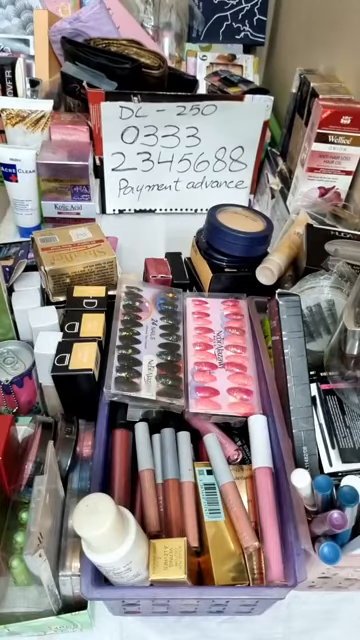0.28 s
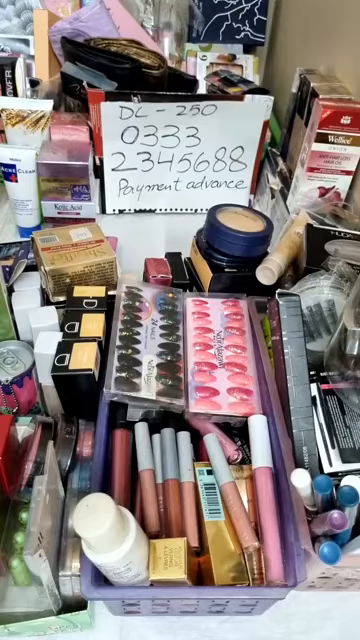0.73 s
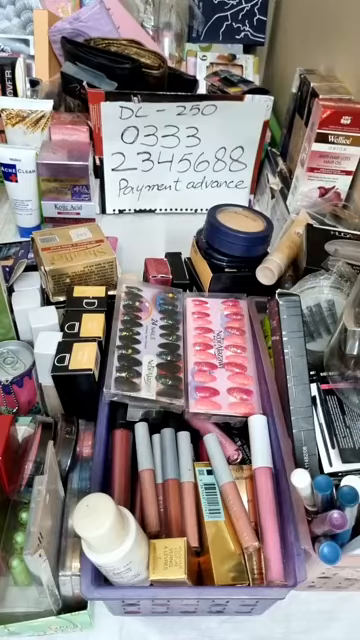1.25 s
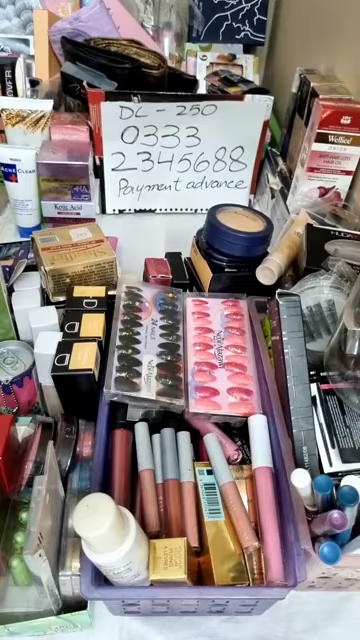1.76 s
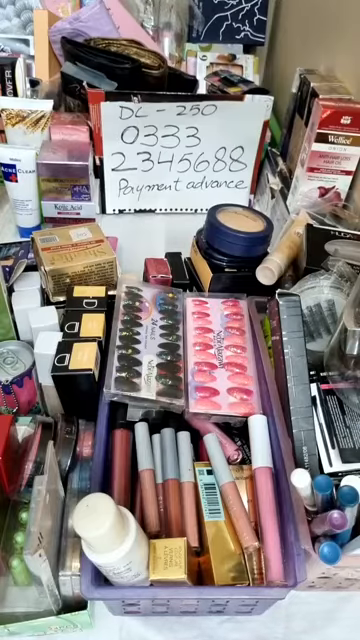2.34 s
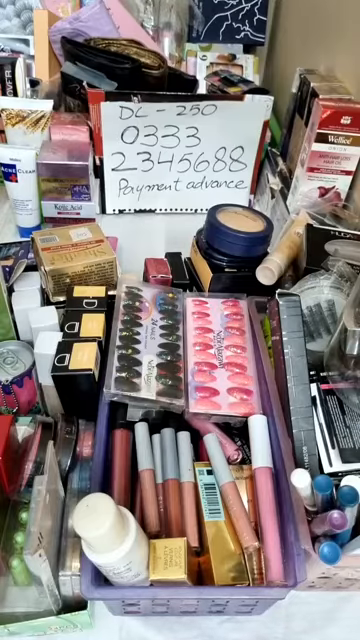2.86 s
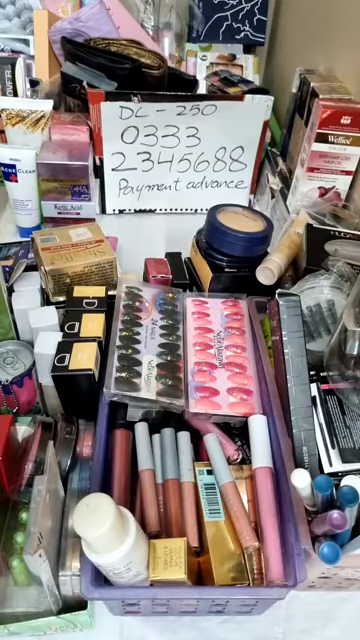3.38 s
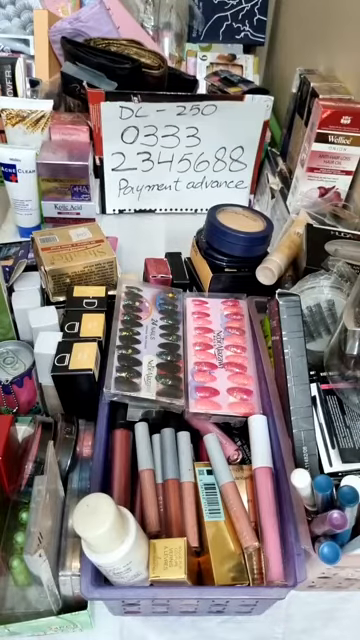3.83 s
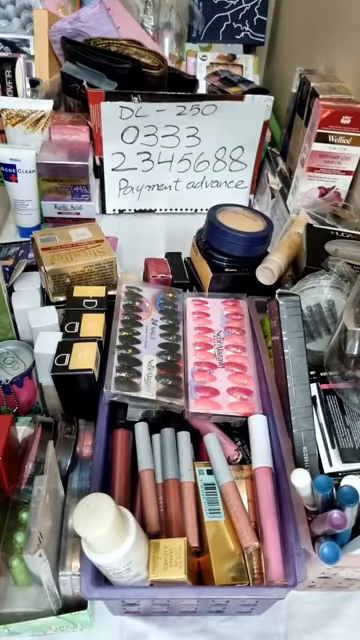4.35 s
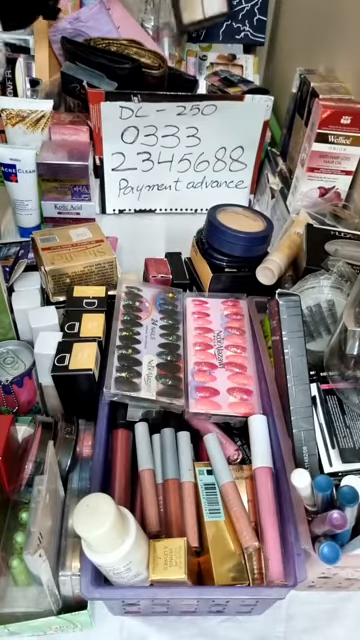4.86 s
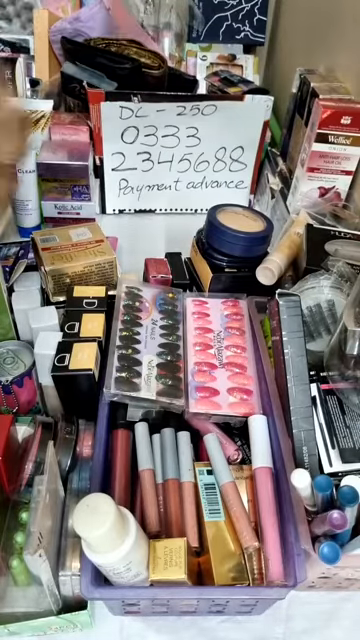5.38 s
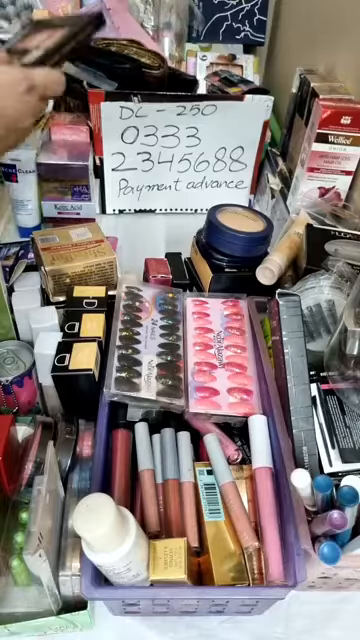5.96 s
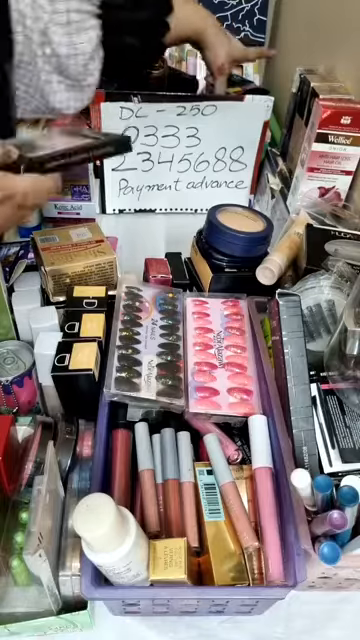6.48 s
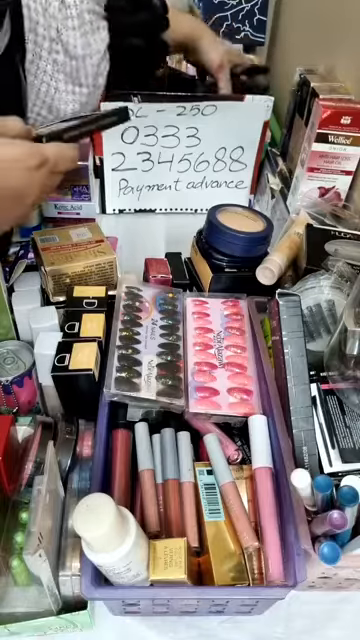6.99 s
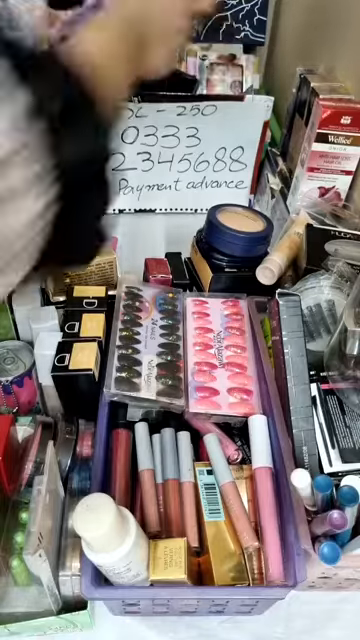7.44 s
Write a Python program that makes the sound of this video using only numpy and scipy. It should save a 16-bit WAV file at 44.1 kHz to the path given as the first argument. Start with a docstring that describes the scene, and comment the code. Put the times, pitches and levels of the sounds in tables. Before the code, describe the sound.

A small engine outside drones up and eases off over street rumble and fan hiss, brief plastic crackles nearby, then a slower engine idles in thuds.

```python
"""Engines outside a shop, fan and wrapper within

A small engine outside revs up and eases off, heard through the shop walls: harmonics of its firing rate,
with exhaust pulses ringing room resonances. Near the end a slower engine idles, each thud a ringing push.
Shaped noise makes the low street rumble and the fan hiss in the room, which throbs with the blades.
Now and then a plastic wrapper crackles near the two microphones: short bursts of grainy bright noise."""
import sys
import numpy as np
from scipy import signal
from scipy.fft import rfft, irfft
from scipy.io import wavfile
from scipy.ndimage import uniform_filter1d

SR = 44100
rng = np.random.default_rng(int(sys.argv[2]) if len(sys.argv) > 2 else 0)


def unload_audio(sound):
    """Save the sound as a 16-bit wav file, at the path given as the first command line argument."""
    columns = np.transpose(np.atleast_2d(sound))
    # keep every value between -1 and 1, then stretch to whole-number steps
    steps = np.round(np.clip(columns, -1, 1) * 32767)
    wavfile.write(sys.argv[1], SR, steps.astype(np.int16))


N = 340452

# Levels are those of each source, ahead of the left-right gains and the microphones.
# Firing speed of the revving engine. Each row: time in seconds, firings per second.
ENGINE_SPEED = [(0.0, 20.05), (0.22, 19.74), (0.34, 19.7), (0.7, 20.0), (0.94, 20.89), (1.28, 21.84),
                (1.94, 22.72), (2.24, 23.72), (2.44, 23.66), (2.8, 24.15), (2.98, 23.87), (3.14, 24.08),
                (3.22, 24.01), (3.46, 23.14), (3.54, 22.95), (3.78, 23.37), (3.88, 23.36), (4.36, 22.43),
                (4.5, 22.05), (4.7, 22.06), (4.82, 21.93), (5.3, 21.02), (5.66, 21.28), (5.98, 22.15)]
# Its strong harmonics, swelling in turn as it moves along the street.
# Each row: time in seconds, then levels of the 4th, 5th, 6th and 7th harmonic in dB.
ENGINE_HUM = [(0.04, -46.5, -44.0, -43.5, -44.0), (0.15, -52.5, -47.0, -36.5, -35.5),
              (0.32, -43.5, -39.5, -37.5, -34.0), (0.48, -45.0, -54.0, -40.0, -31.5),
              (0.64, -44.5, -45.5, -31.0, -33.5), (0.76, -40.5, -48.0, -33.5, -39.5),
              (0.86, -40.5, -29.5, -41.0, -54.0), (0.96, -38.5, -24.5, -40.5, -47.5),
              (1.06, -53.0, -21.0, -36.5, -52.5), (1.18, -52.0, -21.0, -42.5, -53.5),
              (1.3, -42.5, -27.0, -31.0, -44.5), (1.39, -49.0, -30.5, -28.5, -47.5),
              (1.5, -50.0, -28.0, -31.0, -47.5), (1.58, -52.5, -28.0, -31.5, -54.0),
              (1.66, -40.5, -45.5, -31.5, -47.5), (1.76, -41.5, -40.0, -31.0, -52.0),
              (1.9, -42.0, -33.5, -38.0, -53.5), (2.02, -37.5, -38.5, -38.5, -45.0),
              (2.12, -32.0, -31.0, -35.0, -36.0), (2.26, -35.5, -29.0, -41.5, -47.0),
              (2.42, -40.0, -35.0, -29.5, -44.0), (2.5, -40.0, -26.5, -39.0, -43.5),
              (2.59, -31.5, -22.5, -39.0, -54.0), (2.7, -42.5, -30.0, -37.5, -51.5),
              (2.8, -49.5, -30.5, -47.5, -48.5), (2.94, -42.0, -31.0, -35.5, -47.5),
              (3.02, -37.0, -26.0, -48.0, -46.0), (3.12, -41.0, -33.0, -32.0, -37.0),
              (3.2, -36.0, -25.5, -41.5, -42.5), (3.28, -42.5, -33.0, -38.0, -42.0),
              (3.36, -35.5, -32.5, -26.0, -36.0), (3.44, -38.0, -35.0, -26.5, -37.0),
              (3.54, -39.5, -29.5, -21.5, -53.0), (3.69, -48.5, -34.0, -33.0, -48.0),
              (3.8, -42.5, -30.0, -29.5, -50.0), (3.92, -40.5, -25.5, -26.0, -51.0),
              (4.1, -45.0, -29.5, -20.5, -52.0), (4.2, -51.0, -32.0, -21.0, -42.0),
              (4.3, -41.5, -26.0, -22.0, -45.5), (4.4, -38.5, -25.5, -25.0, -48.0),
              (4.54, -34.0, -21.0, -33.0, -51.0), (4.62, -35.5, -25.0, -26.5, -53.0),
              (4.72, -41.0, -27.0, -46.0, -45.0), (4.84, -41.0, -30.0, -32.0, -42.0),
              (5.02, -42.0, -30.0, -36.0, -38.5), (5.14, -51.5, -27.0, -41.5, -39.5),
              (5.28, -46.5, -29.5, -37.0, -43.5), (5.36, -41.5, -24.0, -30.5, -36.0),
              (5.43, -37.0, -23.0, -29.5, -40.5), (5.51, -36.5, -24.0, -35.0, -48.0),
              (5.58, -48.5, -39.0, -35.5, -53.0), (5.66, -47.5, -32.5, -34.0, -37.5),
              (5.74, -42.0, -49.0, -32.5, -54.0), (5.82, -46.5, -47.0, -39.5, -45.5),
              (5.98, -47.0, -45.0, -39.5, -52.5)]
# Upper buzz of the exhaust. Each row: time in seconds, buzz level in dB,
# level in dB of the drone in the highest room resonance.
EXHAUST_LEVELS = [(0, -50.5, -51.5), (1, -50, -56), (1.5, -48.5, -54), (2.0, -54, -56.5),
                  (2.45, -48, -53.5), (2.9, -41, -44), (3.3, -46, -53), (3.6, -50.5, -44),
                  (3.85, -46.5, -56), (4.1, -42, -38.5), (4.35, -42.5, -51.5), (4.6, -45, -44.5),
                  (4.95, -40, -48.5), (5.2, -46, -42), (5.35, -44, -37), (5.5, -49, -57), (5.7, -54, -62)]
# Room resonances under the buzz; sound passes them twice.
# Each row: centre in Hz, width in Hz and gain in dB for one pass.
BUZZ_RESONANCES = [(166, 17, -8), (199, 10, -2.5), (232.6, 13, -5.5), (258.1, 20, -0.5)]
# The highest room resonance, also passed twice. Its row: centre in Hz, width in Hz and gain in dB for one pass.
DRONE_RESONANCE = [(328.5, 23, 0)]
# Traffic rumble. Each row: time in seconds, level in dB, extra weight on the lowest boom in dB.
RUMBLE_LEVELS = [(0, -33.5, -6.5), (.92, -31, -11.5), (1.12, -34, -2), (1.5, -33, -11.5), (2.3, -32.5, -11),
                 (3.4, -31, -10.5), (3.9, -34, -10), (4.5, -34.5, -11.5), (5.4, -31.5, -10),
                 (5.6, -32.5, -6), (6.2, -32, -5.5), (6.5, -33, -3.5), (7.2, -31.5, -4.5),
                 (7.72, -32, -3.5)]
# Spectrum of the rumble before the boom is weighted. Each row: frequency in Hz, relative level in dB.
RUMBLE_SPECTRUM = [(20, -62), (35, -27), (48, 12), (70, 0), (100, -7), (112, 0), (123, 1), (131, -6),
                   (152, -11.5), (165, -4), (180, -11.5), (197, -7.5), (262, -15), (290, -19.5), (335, -15),
                   (365, -21.5), (900, -90)]
# Fan in the room. Each row: time in seconds, level in dB, treble lift in dB.
FAN_LEVELS = [(0, -41.5, 0), (.9, -41, 2), (1.42, -42.5, 1.5), (3.2, -41, 0.9), (3.83, -42.5, 1),
              (5.74, -42.5, 0.9), (6.3, -42.5, 0.5), (7.1, -41.5, 2.3), (7.3, -41.5, 1.5), (7.72, -41, 3.5)]
# Spectrum of the fan before lift and throb. Each row: frequency in Hz, relative level in dB.
FAN_SPECTRUM = [(180, -45), (300, -13.5), (400, -11.5), (620, -10.5), (890, -13.5), (1070, -10),
                (1250, -16), (1500, -15.5), (2100, -19.5), (3000, -24.5), (3800, -28.5), (6300, -38.5),
                (8100, -38), (8800, -45), (10300, -53), (14500, -50.5), (15600, -52)]
# Likeness of the two microphones for rumble and fan. Each row: frequency in Hz, left-right correlation (-1 to 1).
LIKENESS = [(60, 0.87), (130, 1), (290, 0.8), (640, 0.5), (1410, 0.014), (3100, 0.21), (6820, -0.28),
            (15000, 0.19)]
# Balance of rumble and fan. Each row: frequency in Hz, left minus right in dB.
BALANCE = [(60, 0.5), (200, -0.5), (380, 1), (700, 1.5), (1290, 0), (2380, 0.3), (4400, 0), (8120, -1),
           (15000, -2)]
# Wrapper bursts. Each row: start in seconds, level in dB, left minus right in dB,
# rise in seconds, time to fall by 60 dB in seconds.
WRAPPER_BURSTS = [(.694, -60.5, -.6, .004, .12), (1.041, -45.5, -1, 0.01, .16),
                  (1.644, -44, -1.1, 0.015, 0.25), (1.666, -47, -5, .003, .03),
                  (1.813, -44.5, -3, .008, 0.056), (2.37, -57, -5, 0.027, .38), (2.51, -59, -5, .015, 0.24),
                  (3.54, -60, -2, .045, 0.6), (5.57, -57, -1, .019, .3), (7.2, -53.5, -1.1, .024, .34),
                  (7.28, -58, -2, 0.02, .29), (7.5, -67, -3, .033, .4)]
# Spectrum of the wrapper. Each row: frequency in Hz, relative level in dB.
WRAPPER_SPECTRUM = [(1470, -33), (2500, 3.5), (4940, -3.5), (5930, 1), (6710, -3), (7600, 0.5), (9000, -10),
                    (11000, -16), (13900, -12), (15600, -13)]
# Idling engine, about ten thuds a second. Each row: start of the push in seconds, peak level of its thud in dB.
IDLE_THUDS = [(5.625, -24.5), (5.862, -28.5), (6.024, -30), (6.127, -30), (6.268, -25.5), (6.36, -21),
              (6.458, -19.5), (6.547, -21), (6.643, -17.5), (6.737, -19), (6.831, -18.5), (6.931, -18),
              (7.027, -23), (7.129, -21.5), (7.22, -20), (7.318, -20.5), (7.41, -25), (7.509, -19),
              (7.599, -20), (7.682, -16)]
# What each thud rings; neighbours of like sign leave a dark valley between them.
# Each row: centre in Hz, width in Hz, relative level in dB, signed weight that multiplies that level.
IDLE_RESONANCES = [(55, 12, -1.5, 0.59), (73, 14, 7, -0.78), (103.5, 12, 8.5, 0.87), (135.6, 3.9, 13, 1)]

FIRST_TURN = .5  # share of a firing cycle already past at the start
WAVER_DB, DRONE_WAVER_DB = .6, 1.5  # small chance wobble (rms) of each harmonic, and of the drone
SMEAR_TURNS = .2  # the exhaust pipe spreads each pulse: harmonics away from mid-hum slip out of step
# Uneven firing blurs the harmonics by this much for each firing per second above this speed.
ROUGH_RAD, ROUGH_FROM_PER_S = .5, 23.1
SHUT_S, SHUT_ROUGH_RAD = 5.55, 1.4  # the throttle shuts and the firing stumbles
JITTER_TURNS_PER_RAD = .02  # uneven firing also shifts each exhaust pulse
ENGINE_END_S, ENGINE_FADE_S = 6.15, 0.11
BOOM_HZ, BOOM_WIDTH_HZ = 53, 45.4
BLADES_PER_S, THROB, THROB_TURNS = 15.05, .15, .3  # rate, depth as a share of level, starting phase
GRAINS_PER_S, GRAIN_SPREAD_DB = 2000, 2.5  # tiny snaps of the film
HISS_SHARE = 1.3  # smooth rustle under the snaps
EDGE_HZ = 15720  # upper edge of the band


def gain_of(db):
    """Amplitude factor of a level in dB."""
    return 10 ** (np.asarray(db) / 20)


def evened(x):
    """Scale a signal to rms 1."""
    return x / np.sqrt(np.mean(x ** 2) + 1e-20)


def read(points, hz):
    """Read a spectrum table, in straight lines over log frequency."""
    f, value = np.transpose(points)
    return np.interp(np.log(hz + 1), np.log(f + 1), value)


def columns(rows, t):
    """Read every column of a timed table at the times t."""
    s, *values = np.transpose(rows)
    return [np.interp(t, s, v) for v in values]


def ring(x, modes):
    """Sum of resonances, each with its own gain in dB at its centre."""
    out = 0
    for hz, width, db in modes:
        b, a = signal.iirpeak(hz, hz / width, SR)
        out = out + gain_of(db) * signal.lfilter(b, a, x)
    return out


def slow(per_s):
    """Slow chance drift of rms 1: noise averaged twice over 1 / per_s seconds."""
    width = int(SR / per_s)
    once = uniform_filter1d(rng.standard_normal(N), width)
    return evened(uniform_filter1d(once, width))


def diffuse(field_db, size, patchy_db):
    """Stereo noise from random short-time spectra, shaped by field_db(hz, t) and by random patches."""
    frames, hz = 4 * N // size + 5, np.fft.rfftfreq(size, 1 / SR)
    t = np.arange(frames) * size / 4 / SR
    a, b, c, d, patches = rng.standard_normal((frames, len(hz), 5)).T
    patches = evened(uniform_filter1d(uniform_filter1d(patches, 8, 0), 8, 1))
    same = np.clip(read(LIKENESS, hz), -1, 1)[:, None]
    left, other = a + 1j * b, c + 1j * d
    right = same * left + np.sqrt(1 - same ** 2) * other
    spectra = np.array([left, right])
    spectra *= gain_of(field_db(hz[:, None], t) + patchy_db * patches)
    sides = np.array([1, -1])[:, None, None]
    spectra *= gain_of(read(BALANCE, hz)[:, None] / 2 * sides)
    _, noise = signal.istft(spectra, nperseg=size, noverlap=size * 3 // 4)
    return evened(noise[:, :N])


def pulses(turns, spread_db):
    """One click a firing, each a little stronger or weaker."""
    cycle = np.floor(turns)
    fired = np.diff(cycle, prepend=cycle[0]) > 0
    return fired * gain_of(spread_db * rng.standard_normal(len(turns)))


def engine():
    """Low harmonics of the firing rate, and exhaust pulses that ring the room higher up."""
    t = np.arange(N) / SR
    per_s = columns(ENGINE_SPEED, t)[0]
    turns = FIRST_TURN + np.cumsum(per_s) / SR
    stumble = SHUT_ROUGH_RAD * np.clip((t - SHUT_S) / .1, 0, 1)
    rough = ROUGH_RAD * np.maximum(per_s - ROUGH_FROM_PER_S, .1) + stumble

    hum = np.zeros(N)
    for k, db in enumerate(columns(ENGINE_HUM, t), start=4):
        level = np.sqrt(2) * gain_of(db + WAVER_DB * slow(7.2))  # rms level to peak
        phase = 2 * np.pi * (k * turns + SMEAR_TURNS * (k - 5.5) ** 2)
        hum += level * np.cos(phase + rough * slow(27))

    exhaust = pulses(turns + JITTER_TURNS_PER_RAD * rough * slow(30), spread_db=.7)
    buzz_db, drone_db = columns(EXHAUST_LEVELS, t)
    buzz = gain_of(buzz_db) * evened(ring(ring(exhaust, BUZZ_RESONANCES), BUZZ_RESONANCES))
    drone = evened(ring(ring(exhaust, DRONE_RESONANCE), DRONE_RESONANCE))
    drone = drone * gain_of(drone_db + DRONE_WAVER_DB * slow(per_s=18))
    fade = np.clip((ENGINE_END_S - t) / ENGINE_FADE_S, 0, 1)
    return fade * (hum + buzz + drone)


def rumble():
    """Low noise of the street; its lowest boom comes and goes."""
    def field_db(hz, t):
        boom = np.exp(-((hz - BOOM_HZ) / BOOM_WIDTH_HZ) ** 2)
        return read(RUMBLE_SPECTRUM, hz) + columns(RUMBLE_LEVELS, t)[1] * boom
    level_db = columns(RUMBLE_LEVELS, np.arange(N) / SR)[0]
    return diffuse(field_db, size=4096, patchy_db=0.5) * gain_of(level_db)


def fan():
    """Wide hiss that swells each time a blade sweeps by, less and less toward the treble."""
    def field_db(hz, t):
        treble = np.clip(np.log2(hz / 2500 + 1e-9) / 2, 0, 1)  # 0 up to 2500 Hz, 1 from 10 kHz
        sweep = np.cos(2 * np.pi * (BLADES_PER_S * t + THROB_TURNS))
        throb = 1 + THROB * (1 - treble) * sweep
        return read(FAN_SPECTRUM, hz) + columns(FAN_LEVELS, t)[1] * treble + 20 * np.log10(throb)
    level_db = columns(FAN_LEVELS, np.arange(N) / SR)[0] + 0.3 * slow(12.0)
    return diffuse(field_db, size=512, patchy_db=1.01) * gain_of(level_db)


def crackles():
    """Snaps of plastic film as grainy bright noise, in bursts with a quick rise and a room tail."""
    t, level = np.arange(N) / SR, np.zeros((2, N))
    for s, db, pan_db, rise, t60 in WRAPPER_BURSTS:
        attack = np.clip((t - s) / rise, 0, 1) ** 2
        tail = gain_of(-60 * np.maximum(t - s - rise, 0) / t60)
        level += attack * tail * gain_of(db + pan_db / 2 * np.array([[1], [-1]]))
    snap_db = GRAIN_SPREAD_DB * np.minimum(rng.exponential(1, N), 4)
    snaps = (rng.random(N) < GRAINS_PER_S / SR) * gain_of(snap_db)
    graininess = HISS_SHARE + evened(uniform_filter1d(snaps, size=12))
    grains = rng.standard_normal((2, N)) * graininess
    colour = gain_of(read(WRAPPER_SPECTRUM, np.fft.rfftfreq(N, 1 / SR)))
    bright = irfft(rfft(grains) * colour, N)
    return level * evened(bright)


def idler():
    """Slow soft thuds, dulled by the wall, each ringing the room."""
    push = np.zeros(N)
    for s, db in IDLE_THUDS:
        push[round(s * SR)] = gain_of(db)
    click = signal.unit_impulse(SR // 2)
    ringing = sum(sign * ring(click, [mode]) for *mode, sign in IDLE_RESONANCES)
    wall = signal.butter(4, 165, fs=SR, output="sos")
    thud = signal.sosfilt(wall, ringing)
    return signal.oaconvolve(push, thud / abs(thud).max())[:N]


def scene():
    """Engines almost alike at both microphones; they, street and fan reach the left a little earlier."""
    low = engine() + idler()
    engines = np.array([low * gain_of(1.0), low * gain_of(-0.37)])
    left, right = engines + rumble() + fan()
    return np.array([left, np.roll(right, shift=4)]) + crackles()  # right lags by 4 samples


def record(dry):
    """The small microphones lose the deepest bass; then the band limit."""
    thin = signal.sosfilt(signal.butter(2, 42, "high", fs=SR, output="sos"), dry)
    band = signal.firwin(1023, EDGE_HZ, window=("kaiser", 9), fs=SR)
    return signal.oaconvolve(thin, band[None], "same")


dry = scene()
out = record(dry)
unload_audio(out)
```